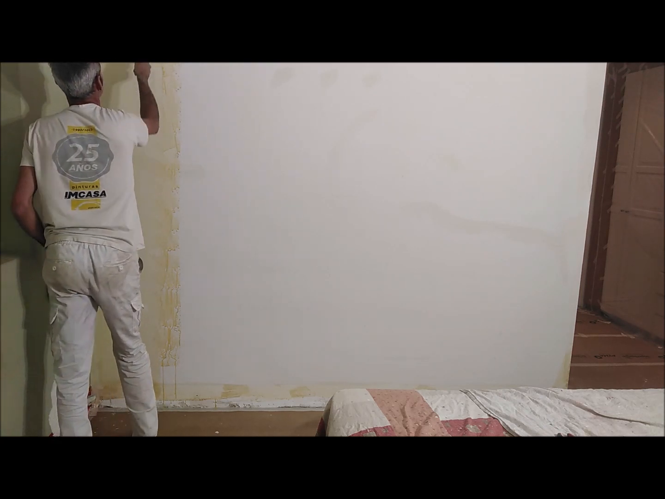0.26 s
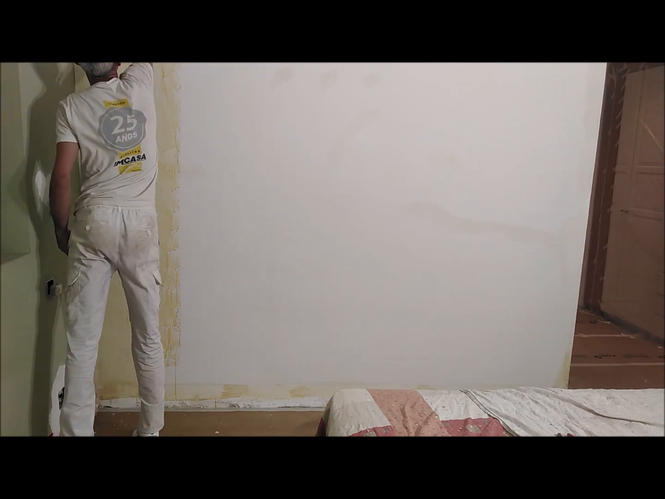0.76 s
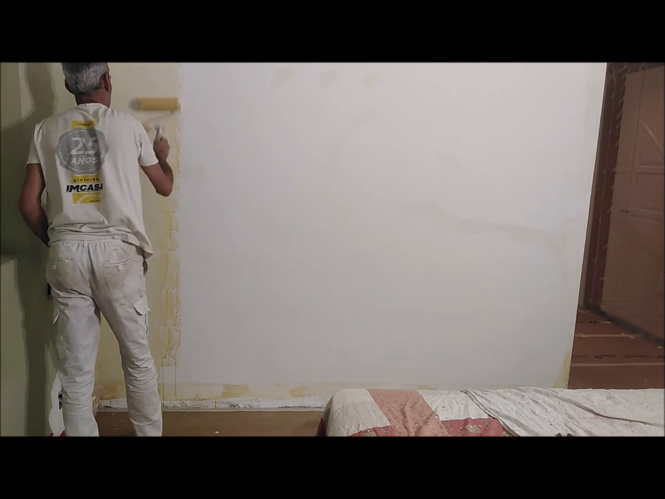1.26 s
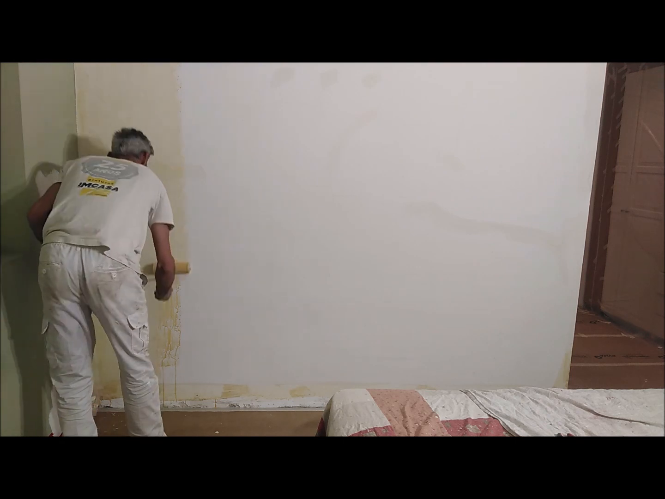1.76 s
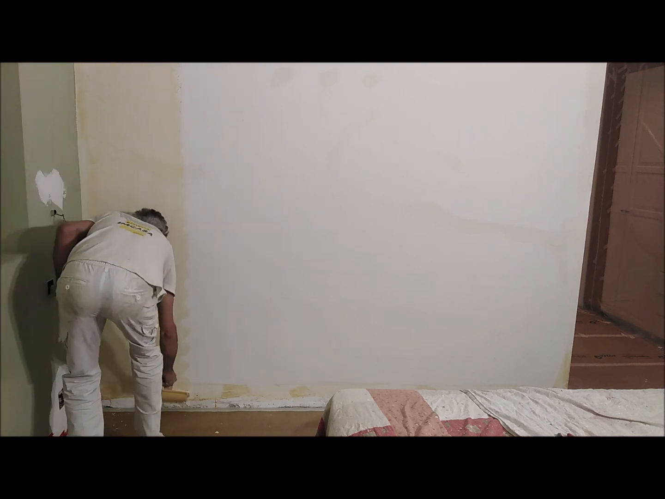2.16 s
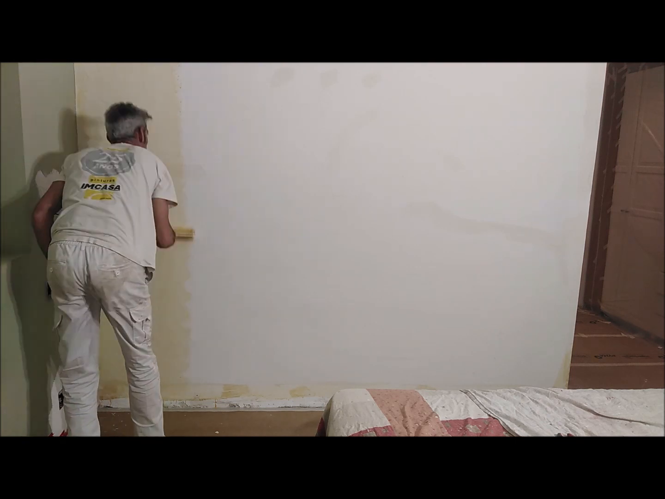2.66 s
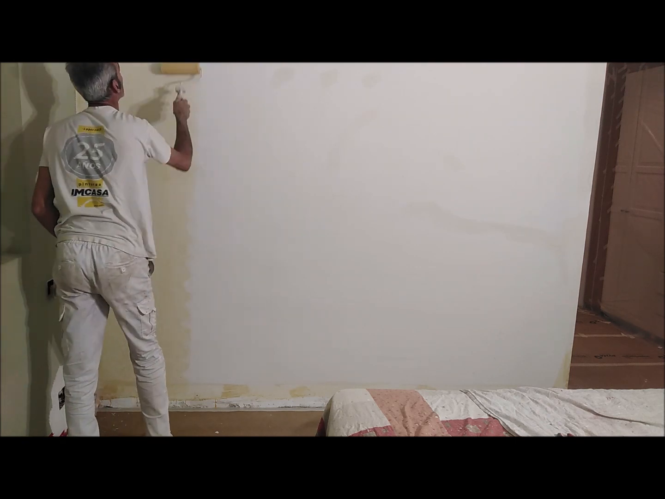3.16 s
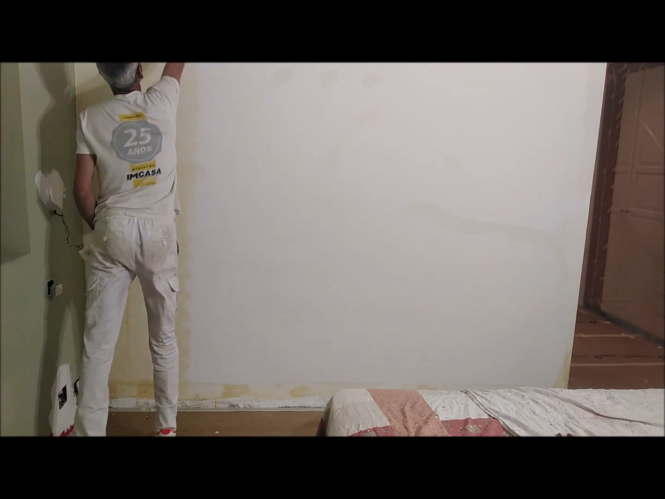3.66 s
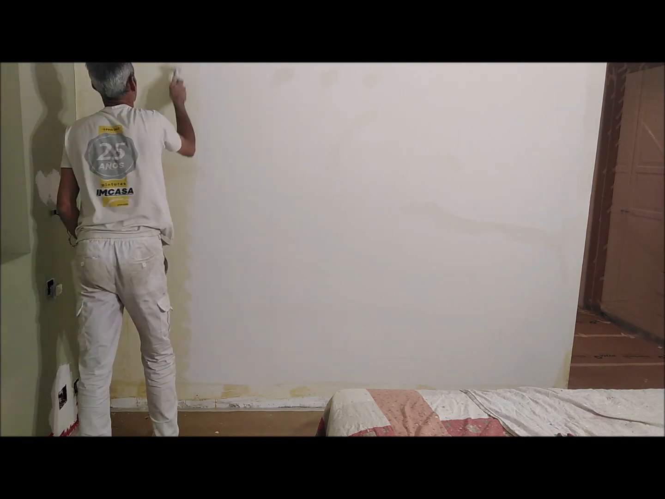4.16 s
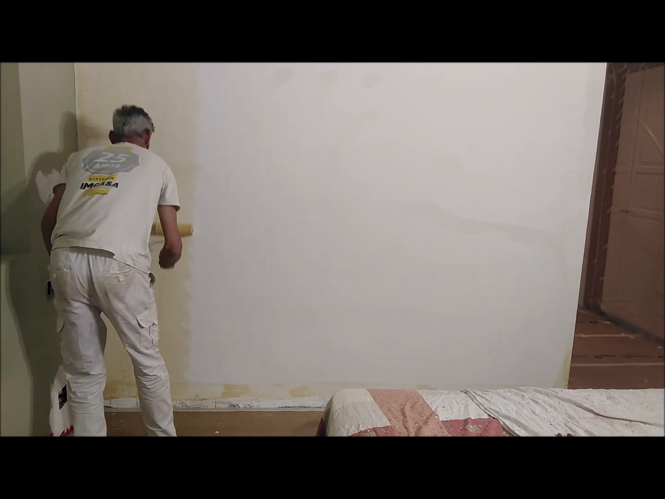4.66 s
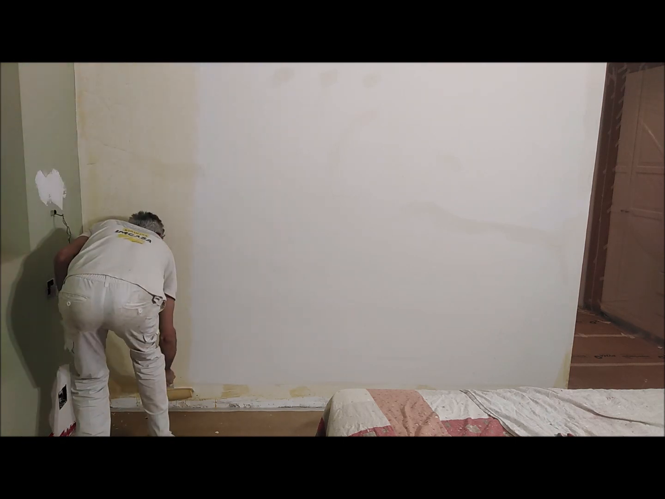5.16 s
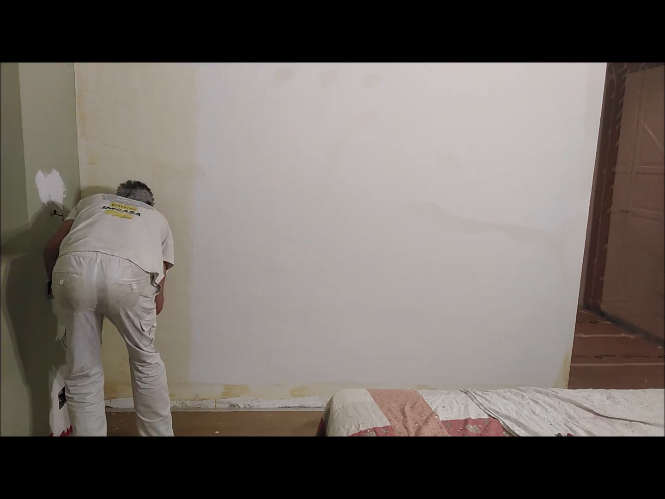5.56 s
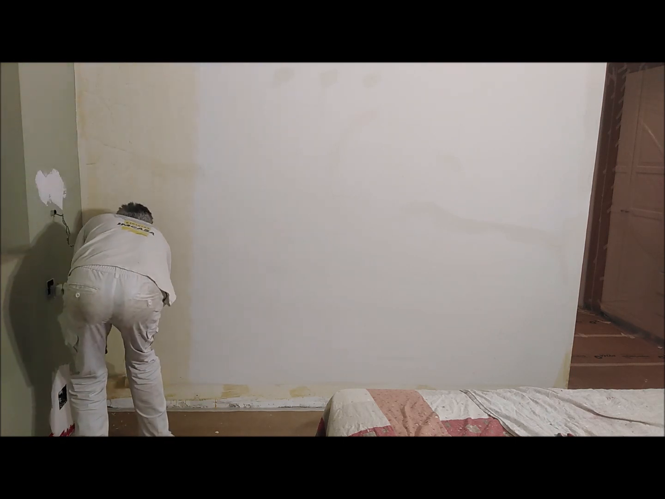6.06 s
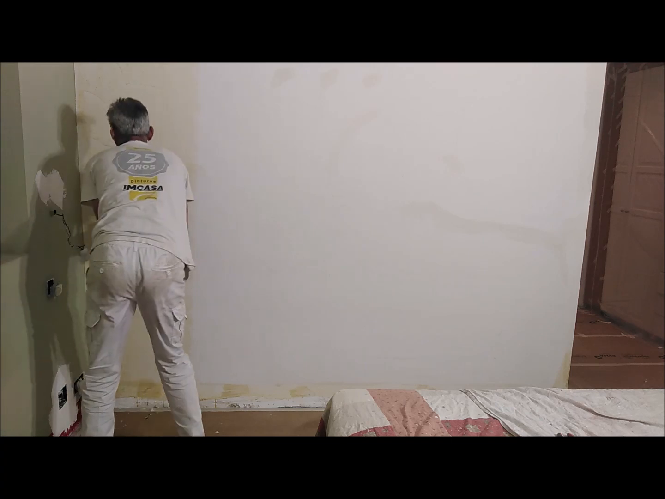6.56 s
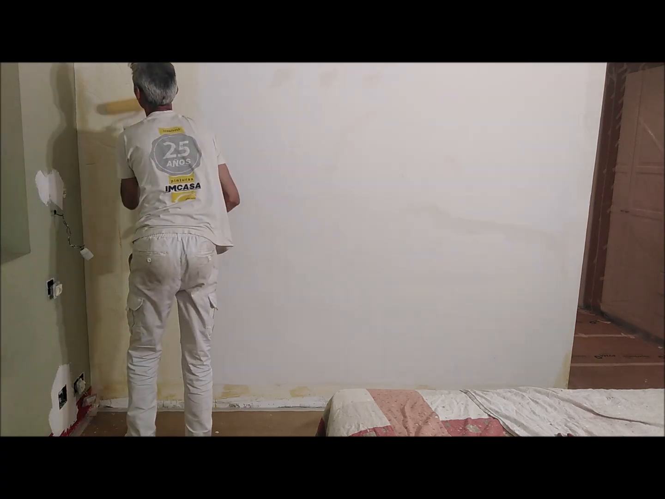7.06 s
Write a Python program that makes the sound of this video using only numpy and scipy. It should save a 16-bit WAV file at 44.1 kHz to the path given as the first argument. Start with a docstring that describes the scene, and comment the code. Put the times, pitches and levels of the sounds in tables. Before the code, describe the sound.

A paint roller loaded with wet primer hisses and rasps up and down a plaster wall, with dull knocks at turns and a final wet slap.

```python
"""A dense wet hiss, a rough rasp and a low rumble rise and fall: a painter rolls primer up and down a plaster wall.
It is a few metres away in a bare room. Random clicks make the hiss of snapping threads and the rasp of the nap,
with short pitched grains that mottle the treble; shaped noise and wavering tones make the rumble. Ringing tones and
short room tails make the roller's knocks, mostly as a downstroke begins, and the footsteps. At the end the painter
steps aside and sets the roller down with a spurt of noise and a wet squeak."""
import sys
import numpy as np
from scipy import signal
from scipy.fft import rfft, irfft, next_fast_len
from scipy.io import wavfile
from scipy.ndimage import uniform_filter1d

SR = 44100
rng = np.random.default_rng(int(sys.argv[2]) if len(sys.argv) > 2 else 0)


def persist_wave(psi):
    """Save psi, clipped to +-1, as 16-bit WAV."""
    counts = np.round(np.clip(psi, -1, 1) * 32767).astype(np.int16)
    wavfile.write(sys.argv[1], SR, np.atleast_2d(counts).T)


N = 323253
TIME = np.arange(N) / SR

# strokes of the arm, each ending where the next begins: (start [s], starting height [m],
# share of full speed left in the turn [0-1], time to get up to speed [s], time to brake [s], extra rasp [dB],
# hiss that the pressure gives at full speed early [dB], midway [dB] and late in the stroke [dB])
STROKES = [(-.25, 1.3, 0.16, 0.076, .06, -0.68, -39.5, -41, -45),
           (.86, 2.13, 0.2, 0.11, 0.14, .6, -36.5, -39.5, -38.5),
           (2.39, .3, 0.12, 0.17, .12, 0.87, -33.5, -39, -40.5),
           (3.909, 2.26, 0.21, 0.2, 0.13, 0.45, -34.5, -38.5, -37.4),
           (5.319, .3, 0.23, 0.16, 0.12, 0.31, -33, -33, -34),
           (5.789, 0.93, 0.22, 0.14, 0.12, -0.25, -34.5, -32.5, -33),
           (6.195, 0.395, 0.25, 0.14, 0.098, -0.052, -35, -34, -32),
           (6.622, 0.86, 0.27, 0.098, 0.18, -0.29, -31, -32.5, -37.5),
           (6.822, 1.13, 0.23, 0.066, 0.2, .3, -40, -39.5, -38.5),
           (6.988, 1.4, 0.26, 0.2, .1, 0.96, -41.5, -41, -45)]
# tone colour of the snapping threads: (frequency [Hz], level per Hz [dB])
THREAD_COLOUR = [(1500, -46.5), (3000, -13.5), (3800, -13.5), (4600, -8.5), (6000, -5), (7100, 0.5),
                 (8100, 0), (9200, -7), (10500, -11), (12000, -16), (14300, -23.5)]
# tone colour of the nap on the plaster: (frequency [Hz], level per Hz [dB])
RASP_COLOUR = [(40, -49), (120, -23.5), (280, -12), (480, -8.5), (700, -3.5), (950, -5), (1350, 0.5),
               (1700, 1.5), (2100, 2.5), (2700, 0.5), (3500, -10), (5000, -15), (9000, -49)]
# low ringing tones of the wall and the room: (frequency [Hz], level [dB], time to fade by 60 dB [s])
WALL_MODES = [(55.7, -14, 0.54), (103.4, 1, 0.49), (141.3, -3.5, 0.95), (170.6, -5.5, 0.36),
              (203.7, -9.5, 1), (267, -3, 0.6), (285.3, -2.5, 0.66), (313.3, -4.5, 0.27), (414, -11, 0.43),
              (446, -11, 0.27), (544.5, -1.5, 0.23), (660, -2, 0.16), (717, -4, 0.18)]
# knocks of the roller, duller where the contact is soft;
# the weaker ones 40 to 60 ms after a hard knock are its echoes from the room:
# (time [s], peak level [dB], upper edge [Hz], pitch of the sleeve against its usual pitch [ratio])
KNOCKS_AND_ECHOES = [(0.339, -47.5, 370, 0.9), (0.36, -46.5, 320, 0.88), (0.924, -32, 1100, 1),
                     (0.966, -45, 750, 1.2), (0.980, -43, 750, 1.11), (1.096, -52, 500, 0.9),
                     (1.144, -47, 650, 1.05), (1.204, -41, 500, 0.97), (3.376, -45.5, 443, 0.96),
                     (3.968, -29.5, 990, 1.07), (4.009, -40, 850, 1.15), (4.164, -39.5, 430, .9),
                     (4.170, -40, 650, 1.32), (4.199, -38, 340, 0.83), (4.207, -47.5, 600, 1.1)]

MIC_HEIGHT_M = 1.195
ROOM_T60_HIGH_S = 0.2  # the treble in the room fades by 60 dB in this time
RUMBLE_LAG_S = 0.052  # the wall takes this long to follow the roller


def undb(db):
    """Turn decibels into a gain."""
    return 10 ** (np.asarray(db) / 20)


def unit(x):
    """Scale to an average (rms) level of 1."""
    return x / np.sqrt(np.mean(x ** 2))


def curves(table):
    """Join each column of a table by straight lines in time."""
    s, *columns = np.transpose(table)
    return [np.interp(TIME, s, c) for c in columns]


def on_bins(points, size):
    """Read a (frequency, value) table at the frequencies of a transform."""
    hz, value = np.transpose(points)
    bin_hz = np.arange(size // 2 + 1) * SR / size
    return np.interp(np.log(bin_hz + 1), np.log(hz), value)


def colour(x, points, size=4096):
    """Give a sound a tone colour (Hz, dB) with a filter that never acts ahead of the sound."""
    cepstrum = irfft(np.log(undb(on_bins(points, size))))
    # folding the cepstrum onto its first half packs the response towards its start
    cepstrum[1:size // 2] *= 2
    cepstrum[size // 2 + 1:] = 0
    response = irfft(np.exp(rfft(cepstrum)))
    return signal.fftconvolve(np.atleast_2d(x), response[None], axes=1)[:, :x.shape[-1]]


def filtered(x, order, hz, kind="low"):
    """Keep what lies below an edge, or above it if the kind is "high"."""
    return signal.sosfilt(signal.butter(order, hz, kind, fs=SR, output="sos"), x)


def low_part(x, hz):
    """The part of a sound below an edge, without any delay, so that it can be taken away cleanly."""
    return signal.sosfiltfilt(signal.butter(3, hz, fs=SR, output="sos"), x)


def diffuse(size):
    """Stereo noise from all around: the two sides are more alike in the bass than in the treble."""
    # likeness of left and right: (frequency [Hz], likeness [0-1])
    likeness = [(60, 0.45), (130, 0.88), (290, 0.75), (620, 0.43), (1360, 0.13), (3000, 0.055)]
    mid, side = rfft(rng.standard_normal((2, 2 * next_fast_len(size // 2 + 1))))
    like = np.clip(on_bins(likeness, 2 * (len(mid) - 1)), 0, 1)
    mid = mid * np.sqrt(1 + like)
    side = side * np.sqrt(1 - like)
    return unit(irfft(np.array([mid + side, mid - side]))[:, :size])


def walk(rate):
    """A wandering random control with about `rate` new values a second; spread 1."""
    k = max(int(SR / rate), 2)
    steps = np.repeat(rng.standard_normal(N // k + 1), k)
    return unit(uniform_filter1d(steps, k)[:N])


def late(control, lag):
    """A control followed a little behind the roller."""
    return np.interp(TIME - lag, TIME, control)


def burst(s, decay, rise):
    """A quick rise and an exponential fall."""
    age = np.maximum(TIME - s, 0)
    return np.minimum(age / rise, 1) * np.exp(-age / decay)


def room(t60, direct_db, size=22050):
    """Response of the bare room: the direct sound and a diffuse tail of energy 1."""
    tail = diffuse(size) * undb(-60 * TIME[:size] / t60)
    tail /= np.sqrt(np.sum(tail ** 2) / 2)
    tail[:, 0] += undb(direct_db)
    return tail


def through(x, response):
    """Play a sound through a response."""
    return signal.fftconvolve(np.atleast_2d(x), response, axes=1)[:, :N]


def add(out, s, sound):
    """Mix a sound in at a time."""
    i = int(s * SR)
    out[:, i:i + sound.shape[1]] += sound[:, :max(N - i, 0)]


def ring(modes, turns, size=22050):
    """Fading tones, as of a struck body, that start at the given phases; energy 1."""
    t = TIME[:size]
    out = sum(undb(db - 60 * t / t60) * np.sin(2 * np.pi * (hz * t + turn))
              for (hz, db, t60), turn in zip(modes, turns))
    return out / np.sqrt(np.sum(out ** 2))


def snaps(rate, spread_db, direct_db):
    """Tiny clicks, most small and a few large, from a source that keeps moving."""
    size = undb(spread_db * np.minimum(rng.exponential(size=N), 6))
    clicks = unit((rng.random(N) < rate / SR) * size)
    # each click takes its own paths round the room, so only its energy has a fixed decay
    early = np.exp(-TIME[:1024] / 0.00037)
    tail_energy = undb(-120 * TIME[:16384] / ROOM_T60_HIGH_S)
    energy = 0
    for share, tail in [(undb(2 * direct_db), early), (1, tail_energy)]:
        wrapped = np.pad(clicks ** 2, (len(tail) - 1, 0), "wrap")
        energy = energy + share * signal.fftconvolve(wrapped, tail / tail.sum(), "valid")
    return diffuse(N) * np.sqrt(np.maximum(energy, 0))


def room_air():
    """The quiet air of the room: steady noise, strongest in the bass."""
    # tone colour of the air: (frequency [Hz], level per Hz [dB])
    air_colour = [(25, -19), (42, -6), (55, 0), (75, -1.5), (140, 4.5), (300, -16.5), (600, -15),
                  (1500, -5), (4000, -9.5), (14000, -18)]
    return undb(-63.5) * unit(colour(diffuse(N), air_colour))


def arm():
    """Each stroke gathers speed, runs and brakes; returns speed (about 1 when full), pressure (dB), height (m)."""
    last_stop_s, last_height_m = 7.6, 2.1
    lean_share = 0.21  # the early and late pressures hold this share of a stroke from its ends
    starts, heights, turn_speeds = np.transpose(STROKES)[:3]
    turns = np.append(starts, last_stop_s)
    speed, pressure = np.zeros(N), []
    for (start, _, _, pickup, brake, _, *levels), stop in zip(STROKES, turns[1:]):
        gather = np.tanh(np.maximum(TIME - start, 0) / pickup)
        speed += gather * np.tanh(np.maximum(stop - TIME, 0) / brake)
        when = start + (stop - start) * np.array([lean_share, .5, 1 - lean_share])
        pressure += zip(when, levels)
    speed = np.hypot(speed, np.interp(TIME, starts, turn_speeds))
    pressure_db, = curves(pressure)
    height = np.interp(TIME, turns, np.append(heights, last_height_m))
    return speed, pressure_db, height


def echoes(x, height):
    """Early reflections whose paths slide as the roller travels, so the colour of the sound keeps shifting."""
    # mirror images of the microphone in floor and ceiling: (height [m], distance [m], level [dB])
    mirrors = [(-0.3, 3.3, -11.5), (4.5, 3.3, -12.5), (-1, 4.6, -10)]
    height = uniform_filter1d(height, size=SR // 4)
    straight = np.hypot(height - MIC_HEIGHT_M, 3.2)  # the microphone is 3.2 m from the wall
    out, now = x.copy(), np.arange(N)
    for mirror_height, distance, db in mirrors:
        detour = np.hypot(height - mirror_height, distance) - straight
        lag = detour / 343 * SR  # in samples, at 343 m/s
        for channel, port in enumerate(rng.uniform(-8, 8, 2)):  # each side hears it a few samples apart
            out[channel] += undb(db) * np.interp(now - lag - port, now, x[channel])
    return unit(out)


def treble_grains():
    """Short pitched grains of random pitch, 2.4 to 7 kHz, that mottle the treble and linger briefly in the room."""
    per_s, low_hz, high_hz, decay_cycles = 380, 2400, 7000, 14
    out, t = np.zeros((1, N)), TIME[:1500]
    for when, place, size in rng.random((int(per_s * N / SR), 3)):
        hz = low_hz * (high_hz / low_hz) ** place
        grain = undb(7.1 * size) * np.sin(2 * np.pi * hz * t) * np.exp(-hz * t / decay_cycles)
        add(out, when * N / SR, grain[None])
    return unit(through(out, room(ROOM_T60_HIGH_S, direct_db=-13.5)))


def hissing(speed, pressure_db, height, jolts):
    """Threads of primer snap behind the nap, mottled by pitched grains, louder with speed, pressure and jolts."""
    threads = echoes(colour(snaps(rate=6000, spread_db=3.0, direct_db=-10.0), THREAD_COLOUR), height)
    level = np.hypot(undb(pressure_db) * speed, jolts)
    return level * (threads + undb(-14.5) * treble_grains())


def shaking(speed):
    """How fully the sleeve shakes the wall (0-1): not at all in the slow moment of a turn."""
    # shaking sets in above 0.3 of full speed, over a further 0.2
    return late(np.clip((speed - .3) / .2, 0, 1), RUMBLE_LAG_S)


def rasping(speed, pressure_db, height, jolts):
    """The nap grates over the grain of the plaster, fuller low on the wall and thinner at each turn."""
    rasp = echoes(colour(snaps(rate=2500, spread_db=3.5, direct_db=-6.5), RASP_COLOUR), height)
    body = low_part(rasp, 1070)
    body_db = 0.77 - 3.5 * (height - MIC_HEIGHT_M)  # the low part loses 3.5 dB per metre upwards
    rasp = rasp - body + body * undb(body_db)
    # the deepest part follows the roller's speed a little behind, so it fades and returns later, and loses more
    # while the sleeve is still
    deep = low_part(rasp, 520)
    deep_gain = late(speed, RUMBLE_LAG_S) ** 0.4 * undb(-0.5 * (1 - shaking(speed)))
    rasp = rasp - deep + deep * deep_gain
    starts, *_, extra_rasp_db, _, _, _ = np.transpose(STROKES)
    extra_db = extra_rasp_db[np.searchsorted(starts, TIME) - 1]
    drying_db = 0.2339 * TIME  # the rasp grows as the nap gives up its primer
    # the nap bites into the plaster a moment after it starts to roll
    bite = late(speed, 0.008) ** 0.88
    level = undb(pressure_db - 10.5 + extra_db + drying_db) * bite
    return np.hypot(level, undb(-8) * jolts) * rasp


def rumbling(speed, pressure_db):
    """Small bumps shake the sleeve and stir the low tones of the wall; uneven patches make it swell and boom."""
    # tone colour of the rumble: (frequency [Hz], level per Hz [dB])
    rumble_colour = [(25, -44), (44, -34), (56, -8), (75, -18), (100, -16.5), (140, -0.5), (175, 1),
                     (230, -5), (300, -4), (450, -10), (700, -15.5), (1200, -33)]
    # uneven patches of plaster, each booming about its own pitch:
    # (middle [s], level [dB], half length [s], pitch before wavering [Hz])
    patches = [(0.087, -62.5, 0.022, 160), (.27, -60, 0.015, 174), (.375, -54.5, 0.027, 205),
               (.78, -64, .03, 170), (1.13, -52.5, 0.047, 150), (1.243, -45.5, 0.035, 150),
               (1.317, -49, 0.023, 145), (1.415, -56, 0.027, 190), (1.527, -57.5, 0.027, 200),
               (1.696, -51, 0.04, 165), (1.798, -62, .02, 186), (1.921, -55.5, 0.025, 150),
               (2.008, -52, 0.021, 148), (2.119, -56.5, 0.029, 155), (2.21, -52.5, 0.033, 220),
               (2.537, -57, 0.012, 160), (2.631, -54, 0.037, 205), (2.77, -49, 0.022, 152),
               (2.872, -52.5, 0.023, 225), (3.003, -52.5, 0.03, 195), (3.083, -54, 0.026, 167),
               (3.259, -50, 0.027, 154), (3.388, -51.5, 0.029, 165), (3.599, -56, .03, 154),
               (3.751, -55.5, 0.027, 187), (4.134, -54, .013, 145), (4.203, -51, 0.037, 165),
               (4.342, -56, 0.036, 155), (4.902, -53.5, 0.028, 159), (4.984, -56, 0.024, 175),
               (5.078, -52, 0.031, 173), (5.17, -62, 0.03, 160), (5.549, -50, 0.038, 205),
               (5.663, -51, 0.042, 180), (5.895, -54, 0.018, 170), (5.998, -52, 0.024, 173),
               (6.091, -53.5, 0.023, 205), (6.182, -58, 0.04, 235), (6.409, -54.5, 0.042, 180),
               (6.491, -53, 0.02, 152), (6.596, -54, .016, 150), (7.14, -61, 0.025, 175)]
    bumps = diffuse(N) * undb(1.4 * walk(24))
    wall = through(bumps, ring(WALL_MODES, rng.random(len(WALL_MODES)))[None])
    rumble = unit(colour(bumps + undb(-19.5) * wall, rumble_colour))
    rolling_level = undb(pressure_db - 21.5) * speed ** 0.96
    drive = shaking(speed) * late(rolling_level, RUMBLE_LAG_S)
    swells = sum(undb(db) * np.exp(-.5 * ((TIME - s) / half) ** 2) for s, db, half, _ in patches)
    pitch_hz = curves(patches)[-1] * (1 + 0.1092 * walk(130))
    tone = np.sin(2 * np.pi * np.cumsum(pitch_hz) / SR)
    boom = unit(tone * undb(1.2 * walk(90)))
    return np.hypot(drive, undb(-4) * swells) * rumble + undb(-2) * swells * boom


def rolling():
    """The moving roller: hiss and rasp flutter together on the unevenly wet nap, over the rumble."""
    speed, pressure_db, height = arm()
    flutter = undb(0.52 * walk(28) + 0.13 * walk(240))
    # a short spurt of hiss and rasp at each row of the table, its level set 15 dB below the row's peak
    jolts = sum(undb(db - 15) * burst(s, decay=0.022, rise=.003) for s, db, *_ in KNOCKS_AND_ECHOES)
    hiss = hissing(speed, pressure_db, height, jolts)
    rasp = rasping(speed, pressure_db, height, jolts)
    return flutter * (hiss + rasp) + rumbling(speed, pressure_db)


def soften(x, contact_hz):
    """A soft contact takes the top off a blow."""
    return filtered(x, 3, contact_hz)


def blow(spectrum, t60, direct_db, ring_db):
    """One blow with the low ring of the wall and the room's tail; energy 1."""
    wall = ring(WALL_MODES, rng.random(len(WALL_MODES)))
    out = colour(room(t60, direct_db) + undb(ring_db) * wall, spectrum)
    return out / np.sqrt(np.sum(out ** 2) / 2)


def at_peak(x, db, size=350):
    """Scale a blow so that its loudest few milliseconds have this level."""
    return x * undb(db) / np.sqrt(uniform_filter1d(np.mean(x ** 2, axis=0), size).max())


def knocks():
    """The sleeve knocks and chatters in its frame, its pitch shifting with the grip; echoes are made the same way."""
    # tone colour of a knock: (frequency [Hz], level per Hz [dB])
    knock_colour = [(25, -51), (55, -33), (100, -13.5), (160, -10.5), (280, -6), (450, 0), (600, -3),
                    (800, -15.5), (1000, -17), (1300, -4), (2000, -28), (5000, -57)]
    # ringing of sleeve and frame, damped by the wet nap:
    # (frequency at usual pitch [Hz], level [dB], time to fade by 60 dB [s])
    sleeve_modes = [(288, -16.5, .11), (340, -9.5, 0.055), (438, 0.5, 0.028), (530, -5, 0.044),
                    (642, -1.5, 0.033), (860, -13.5, 0.031), (1150, -16, 0.031)]
    chatter_gap_s, chatter_db, chatter_loss_db = .01, -13, -2.3  # mean gap, first rebound, change per rebound
    rise_s = 0.0012  # the nap cushions the contact for a moment
    out = np.zeros((2, N))
    for s, db, contact_hz, pitch in KNOCKS_AND_ECHOES:
        modes = [(hz * pitch, level, t60) for hz, level, t60 in sleeve_modes]
        sleeve = ring(modes, np.zeros(len(modes)))[None]
        knock = sleeve + undb(-1.0) * blow(knock_colour, t60=0.53, direct_db=-24.0, ring_db=-13.5)
        gaps = chatter_gap_s * rng.uniform(0.6, 1.4, size=6)
        for k, lag in enumerate(np.cumsum(gaps)):
            rebound = ring(modes, rng.random(len(modes)), size=8192)[None]
            add(knock, lag, undb(chatter_db + k * chatter_loss_db) * rebound)
        knock = knock * np.minimum(TIME[:knock.shape[1]] / rise_s, 1)
        knock = filtered(knock, 2, 0.17 * contact_hz, "high")  # a brief contact moves little bass
        add(out, s, at_peak(soften(knock, contact_hz), db))
    return out


def feet():
    """Heel and toe thud on the floor; the soles scrape over grit."""
    # footfalls and shifts of weight: (time [s], peak level [dB], upper edge [Hz])
    footfalls = [(1.662, -43.5, 648), (6.634, -42.5, 800), (6.660, -37.5, 500), (6.771, -37, 500),
                 (6.798, -36, 451), (6.829, -43, 750)]
    # tone colour of a footfall: (frequency [Hz], level per Hz [dB])
    footfall_colour = [(25, -11), (55, -6), (90, -13), (150, -7), (220, -2.5), (300, 4), (400, -0.5),
                       (550, -11), (900, -16), (2000, -53)]
    # ringing of the floor under a foot: (frequency [Hz], level [dB], time to fade by 60 dB [s])
    floor_modes = [(173, -9.5, 0.067), (274, -3.5, 0.1), (325, -3, 0.089), (386, -7, .06)]
    # scuffs of the soles: (time [s], level [dB], decay [s])
    scuffs = [(6.299, -48, 0.035), (6.585, -46.5, 0.061), (6.633, -42, 0.03), (6.683, -46.5, 0.08),
              (6.778, -54, 0.12), (6.83, -47.5, 0.033), (6.856, -53, 0.098)]
    # tone colour of a scuff: (frequency [Hz], level per Hz [dB])
    scuff_colour = [(35, -30), (100, -23), (300, 0), (700, 0.5), (1500, -2.5), (2500, -10), (5000, -16),
                    (12000, -30)]
    out = np.zeros((2, N))
    for s, db, contact_hz in footfalls:
        floor = ring(floor_modes, rng.random(len(floor_modes)))
        thud = floor + undb(0.4) * blow(footfall_colour, t60=.48, direct_db=-22, ring_db=-16.5)
        add(out, s, at_peak(soften(thud, contact_hz), db))
    grit = unit(colour(snaps(rate=580, spread_db=2.0, direct_db=-6.0), scuff_colour))
    return out + grit * sum(undb(db) * burst(s, decay, rise=0.003) for s, db, decay in scuffs)


def landing():
    """The wet nap slaps on and skids: a spurt of noise and a short wavering squeak."""
    # the roller lands and skids: (time [s], level [dB], decay [s])
    touch = (7.289, -29.5, 0.08)
    s, db, decay = touch
    spurt = unit(colour(diffuse(N), THREAD_COLOUR)) + undb(-17.0) * unit(colour(diffuse(N), RASP_COLOUR))
    squeak_hz = 7000 * (1 + 0.0146 * walk(600))
    phase = 2 * np.pi * np.cumsum(squeak_hz) / SR
    squeak = np.sin(phase) * burst(s - .003, decay=0.011, rise=.005)
    squeak = through(squeak, room(ROOM_T60_HIGH_S, direct_db=5.0))
    return undb(db) * spurt * burst(s, decay, rise=0.0022) + undb(-29) * squeak


def scene():
    """Roller and feet over the quiet air of the room."""
    return room_air() + rolling() + knocks() + feet() + landing()


def record(dry):
    """Two microphones differ in colour, the left hears a little later; deep bass is lost and the top cut steeply."""
    # colour of the two microphones: (frequency [Hz], left minus right [dB])
    tilt = [(100, 0), (700, 1.3), (2000, 1.4), (2600, 0), (5700, -.4), (6500, -2.5), (7200, -5),
            (7700, 2.9), (8300, 5), (9100, 8.5), (10000, 4.5), (13000, 3.6)]
    left, right = [colour(x, [(hz, side * db / 2) for hz, db in tilt])[0] for x, side in zip(dry, (1, -1))]
    left = np.pad(left, (int(.00013 * SR), 0))[:N]  # lag in seconds
    heard = filtered([left, right], 2, 34, "high")
    return signal.sosfilt(signal.ellip(12, .1, 85, 14330, fs=SR, output="sos"), heard)


dry = scene()
out = record(dry)
persist_wave(out)
```